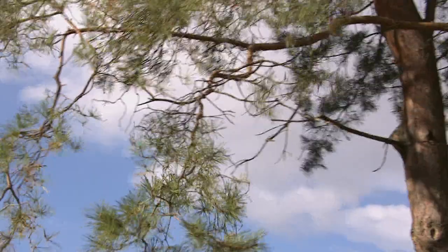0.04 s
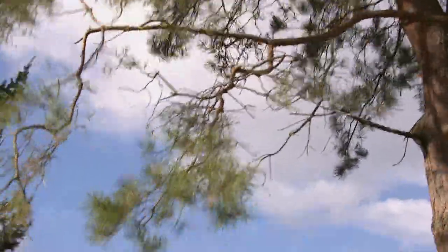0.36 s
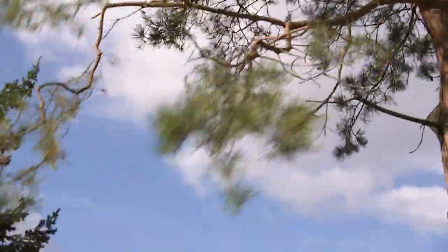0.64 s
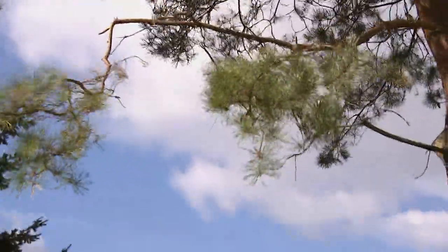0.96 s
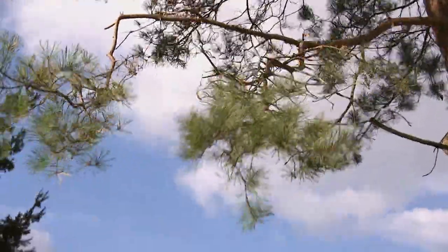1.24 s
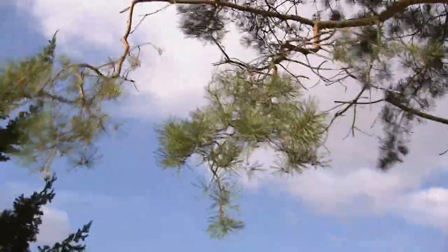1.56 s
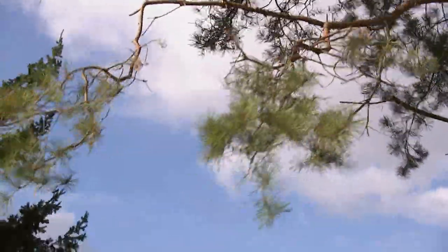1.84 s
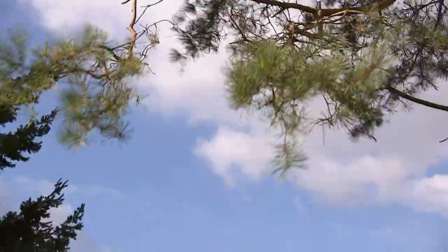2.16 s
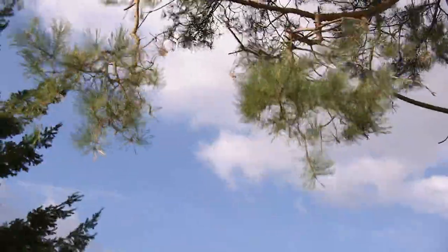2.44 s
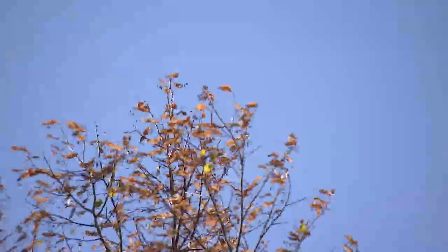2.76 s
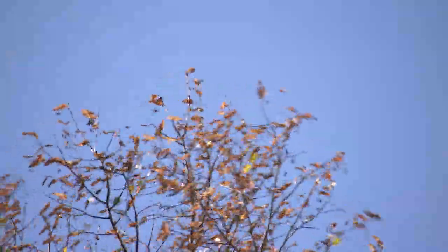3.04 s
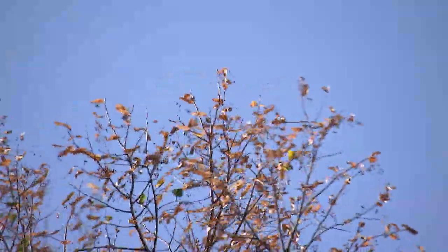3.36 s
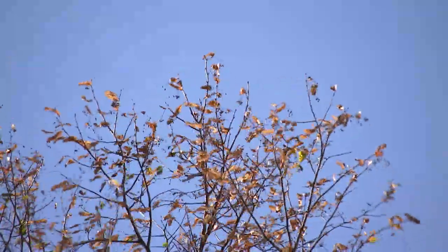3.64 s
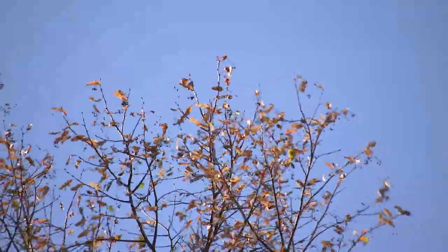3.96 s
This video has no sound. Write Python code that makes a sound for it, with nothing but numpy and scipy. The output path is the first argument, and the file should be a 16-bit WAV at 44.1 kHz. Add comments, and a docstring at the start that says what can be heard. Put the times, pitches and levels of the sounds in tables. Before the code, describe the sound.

Strong wind buffets the microphone, a low uneven rumble over a soft hiss of pine needles. From about 0.5 seconds gusts land as thumps and dull pops, hardest around 2.5 to 2.7. Two barely audible high bird chirps come before 1 second. At 2.7 the left side cuts to a bright rush of dry leaves ticking and slapping until 4 seconds; the buffeting continues on the right, stopping at 3.4.

```python
"""Strong wind buffets a microphone under a pine: gusts rumble and thump over the hiss of the needles
and two faint bird chirps. Hard thumps pop the capsule and trip a limiter, which ducks rumble and hiss.
Then the left channel cuts to a second spot, a bright rush of dry leaves that tick and slap,
while the buffeting goes on in the right channel until that cuts to silence."""
import sys
import numpy as np
from scipy import signal
from scipy.fft import rfft, irfft
from scipy.io import wavfile
from scipy.ndimage import uniform_filter1d

SR = 44100
rng = np.random.default_rng(int(sys.argv[2]) if len(sys.argv) > 2 else 0)


def inscribe(sig):
    """Save sig as 16-bit PCM at rate SR to the path in sys.argv[1].

    A 1-D sig is mono; a 2-D sig holds one channel per row.
    Samples are clipped to [-1, 1] before scaling.
    """
    pcm = np.round(np.clip(np.atleast_2d(sig).T, -1, 1) * 32767)
    wavfile.write(sys.argv[1], SR, pcm.astype(np.int16))


N = 176400

# Single hard eddies hitting the microphone (time [s], thump level [dB], pitch [Hz], pop level [dB])
THUMPS = [(.466, -9, 197, -34), (.542, -7, 121, -40), (.714, -8.5, 190, -29), (.783, -9, 209, -35),
          (0.829, -6, 160, -29), (1.122, -8, 173, -37), (1.181, -5.5, 140, -24.5), (1.3, -7.5, 224, -32.5),
          (1.399, -11, 220, -26.5), (1.529, -8, 200, -29.5), (1.584, -5.5, 118, -32.5),
          (1.919, -5.5, 159, -33), (2.525, -4, 138, -21), (2.622, -6, 220, -25), (2.696, -5, 200, -26.5)]


def amp(db):
    """Decibels to gain."""
    return 10 ** (np.asarray(db) / 20)


def unit(x):
    """Scales to rms 1."""
    return x / np.sqrt(np.mean(x ** 2) + 1e-20)


def clock():
    """Time of every sample."""
    return np.arange(N) / SR


def level(points):
    """Gain envelope through (time [s], level [dB]) points."""
    return amp(np.interp(clock(), *np.transpose(points)))


def colour(x, points):
    """Shapes x with an EQ curve of (frequency [Hz], level [dB]) points, at rms 1."""
    hz, db = np.transpose(points)
    f = np.fft.rfftfreq(N, 1 / SR)
    eq = amp(np.interp(np.log(f + 1), np.log(hz), db))
    return unit(irfft(rfft(x) * eq, N))


def lowpass(x, hz, order=2):
    """The part of x below hz."""
    return signal.sosfiltfilt(signal.butter(order, hz, fs=SR, output="sos"), x)


def wander(hz):
    """Random modulation of rms 1, at rates up to about hz."""
    f = np.fft.rfftfreq(N, 1 / SR)
    return unit(irfft(rfft(rng.standard_normal(N)) * np.exp(-(f / hz) ** 2), N))


def patchy_noise(depth_db):
    """White noise whose level drifts in small patches of time and frequency."""
    spectra = signal.stft(rng.standard_normal(N), nperseg=512)[2]
    patches = uniform_filter1d(rng.standard_normal(spectra.shape), size=7, axis=0)
    patches = uniform_filter1d(patches, size=8, axis=1)
    return signal.istft(spectra * amp(depth_db * unit(patches)))[1][:N]


def burst(s, half_width_s):
    """A bell-shaped envelope centred on time s."""
    return np.exp(-((clock() - s) / half_width_s) ** 2)


def strike(s, decay_s, attack_s=.0001):
    """An envelope that jumps up at time s and dies away."""
    age = np.maximum(clock() - s, 0)
    return np.minimum(age / attack_s, 1) * np.exp(-age / decay_s)


def held(db, release_db_per_s):
    """Holds each peak of db and lets it sink at a steady rate."""
    fall = release_db_per_s * clock()
    return np.maximum.accumulate(db + fall) - fall


def bird():
    """A small bird's faint, thin calls: pure tones that slide down."""
    # Calls (time [s], half-width [s], pitch [Hz], glide [Hz/s], level [dB])
    chirps = [(0.622, .009, 9500, -30000, -66), (.938, .012, 8560, -2000, -69)]
    out = np.zeros(N)
    for s, half_width_s, hz, glide, db in chirps:
        age = clock() - s
        out += amp(db) * burst(s, half_width_s) * np.sin(2 * np.pi * (hz + glide * age / 2) * age)
    return out


def needles():
    """Smooth hiss of air through pine needles."""
    # Colour of the hiss (frequency [Hz], level [dB])
    hiss_eq = [(100, 10), (300, 3), (600, 2), (950, -0.5), (1400, -3), (2100, -6.5), (2900, -8.5),
               (4000, -14), (5500, -18), (6400, -22.5), (7500, -23), (10500, -27), (13000, -33.5),
               (14500, -38)]
    # Envelope of the hiss (time [s], level [dB])
    hiss_envelope = [(.05, -42.5), (.3, -42), (.45, -42.5), (.6, -43.5), (.9, -45), (1.4, -46), (2.0, -46),
                     (2.45, -46.8), (2.75, -45.5), (3.0, -45), (3.44, -50.5)]
    return colour(patchy_noise(depth_db=1.0), hiss_eq) * level(hiss_envelope)


def leaves():
    """A broad, fluttering rush of foliage, with countless dry leaves ticking against each other."""
    # Colour of the rush (frequency [Hz], level [dB])
    rush_eq = [(20, -19), (45, -31), (85, -12), (115, -12.5), (170, 4.5), (250, 0.5), (370, -1.5),
               (480, -5.5), (950, -7.5), (1400, -12.5), (2100, -16), (2900, -14.5), (4000, -17),
               (5600, -19), (6400, -23), (7500, -21), (10500, -26), (12500, -33), (15000, -33)]
    # Envelope of the rush (time [s], level [dB])
    rush_envelope = [(2.72, -29), (2.9, -31), (3.05, -29), (3.3, -28.5), (3.6, -29.5), (4.0, -29.5)]
    # Colour of a tick (frequency [Hz], level [dB])
    tick_eq = [(300, -34), (1800, -22), (2900, 10), (4000, 2), (5400, -5), (6500, -11.5), (10000, -10),
               (12500, -13), (15000, -16)]
    flutter_db, ticks_per_s, tick_spread_db = -0.5, 300, 3
    rush = colour(patchy_noise(depth_db=0.77), rush_eq) * level(rush_envelope)
    rush *= amp(flutter_db * wander(hz=25))
    sizes = amp(tick_spread_db * np.minimum(rng.exponential(1, N), 4)) * rng.choice([-1, 1], N)
    contacts = rng.random(N) < ticks_per_s / SR
    return rush + amp(-48) * colour(sizes * contacts, tick_eq)


def slaps():
    """A dry leaf hits a twig: a thin, bright crack and a brief, unsteady ring of the blade."""
    # Leaf hits (time [s], crack level [dB], ring level [dB], pitch [Hz])
    hits = [(2.7303, -24.5, -38, 4520), (2.823, -40, -27, 2990), (2.826, -18, -34, 3950),
            (2.836, -37, -26, 3700), (2.848, -28, -28, 3510), (2.851, -15, -28, 4600),
            (2.857, -30, -29, 3570), (3.058, -28, -34, 4500), (3.246, -26, -35, 3250),
            (3.317, -33, -22, 2750), (3.563, -38, -33, 2890), (3.634, -35, -24, 3010)]
    # Colour of the crack (frequency [Hz], level [dB])
    crack_eq = [(300, -20), (1500, -9), (3000, 9.5), (5400, 0.5), (7000, -11), (11500, -6), (15000, -15)]
    crack = colour(rng.standard_normal(N), crack_eq)
    waver_hz = 302 * wander(hz=302)
    out = np.zeros(N)
    for s, crack_db, ring_db, hz in hits:
        ring = np.sin(2 * np.pi * np.cumsum(hz + waver_hz) / SR)
        out += amp(crack_db) * strike(s, decay_s=.0009) * crack
        out += amp(ring_db) * strike(s, decay_s=.0035) * ring
    return out


def pops():
    """Each thump bottoms out the capsule: a short, dull pop amid a brief flap of rough air."""
    # Colour of the overdriven capsule (frequency [Hz], level [dB])
    pop_eq = [(200, -3.5), (550, 7.5), (900, -5.5), (1500, -14.5), (3000, -27.5), (6000, -42.5),
              (12000, -62)]
    pop = colour(signal.unit_impulse(N), pop_eq)
    pop /= pop.max()
    flap = amp(-16) * colour(rng.standard_normal(N), pop_eq)
    return sum(amp(db) * (np.roll(pop, round(s * SR)) + flap * burst(s, half_width_s=0.0072))
               for s, _, _, db in THUMPS)


def overload(x):
    """A limiter ducks on strong suction, with a slow and a fast release; what slips past is flattened."""
    threshold_db, ceiling_db, attack_s, knee = -11.5, -12.5, 0.0015, 4.7
    over_db = np.maximum(20 * np.log10(np.maximum(-x, 1e-6)) - threshold_db, 0)
    duck_db = held(over_db, release_db_per_s=11.5) + held(.55 * over_db, release_db_per_s=42)
    pole = np.exp(-1 / (attack_s * SR))
    ducked = x * amp(-signal.lfilter([1 - pole], [1, -pole], duck_db))
    suction = np.maximum(-ducked, 0) / amp(ceiling_db)
    return ducked / (1 + suction ** knee) ** (1 / knee)


def buffeting():
    """Eddies rumble on the microphone, louder and brighter in strong gusts; a few land as thumps."""
    # Force of the wind on the microphone (time [s], level [dB])
    gusts = [(.06, -34.5), (.12, -30), (.16, -38.5), (.31, -32), (.35, -39), (.38, -25.5), (.47, -22.5),
             (.51, -29.5), (.54, -18), (.59, -24), (.68, -22), (.72, -17), (.785, -14.5), (.87, -22),
             (.975, -21.5), (1.01, -28), (1.06, -29.5), (1.11, -17.5), (1.145, -25.5), (1.2, -16.5),
             (1.26, -26), (1.3, -17.5), (1.36, -27.5), (1.41, -15), (1.47, -24), (1.55, -16), (1.62, -19.5),
             (1.75, -18.5), (1.87, -25), (1.915, -17.5), (1.94, -26.5), (2.07, -22), (2.14, -26.5),
             (2.21, -21), (2.26, -26.5), (2.31, -22), (2.44, -32.5), (2.51, -27), (2.56, -13), (2.6, -19.5),
             (2.69, -14), (2.72, -25), (2.8, -28.5), (2.88, -27.5), (2.91, -20.5), (2.97, -24.5),
             (3.02, -17.5), (3.11, -26), (3.145, -19), (3.24, -26.5), (3.37, -24.5), (3.44, -22)]
    # Colour of the eddies (frequency [Hz], level [dB])
    rumble_eq = [(10, -32.5), (22, -14), (45, -1.5), (90, 0), (170, 0), (250, -2), (310, -9.5), (450, -19),
                 (600, -28.5), (950, -39.5), (2000, -63.5), (5000, -98)]
    usual_gust_db, bright_db_per_db, rumble_db, flutter_db = -19.5, 0.076, 1.5, 1.62
    force = level(gusts)
    eddies = colour(rng.standard_normal(N), rumble_eq)
    deep, upper = lowpass(eddies, hz=75), eddies - lowpass(eddies, hz=350)
    deep_gain = level([(.1, 2), (1.2, 0), (2.3, -2), (2.7, -6.5), (3.3, -20)])  # the sub-bass thins out
    upper_gain = (force / amp(usual_gust_db)) ** bright_db_per_db
    eddies = eddies + deep * (deep_gain - 1) + upper * (upper_gain - 1)
    eddies /= np.sqrt(uniform_filter1d(eddies ** 2, size=1800))  # even out, so the gusts set the level
    out = eddies * force * amp(rumble_db + flutter_db * wander(hz=22))
    width_cycles, lead_cycles = 0.43, 0.071
    for s, db, hz, _ in THUMPS:  # a pulse of suction briefly takes the place of the rumble
        cycles = (clock() - s) * hz
        window = np.exp(-((cycles + lead_cycles) / width_cycles) ** 2 / 2)
        out = out * (1 - window) - amp(db) * window * np.cos(2 * np.pi * cycles)
    return out


def scene():
    """Wind under the pine in both channels, cutting to leaves on the left and to silence on the right."""
    pine_on_s, leaves_on_s, pine_off_s = 0.05, 2.725, 3.446
    t = clock()
    pine = overload(buffeting() + needles()) + pops() + bird()
    pine = lowpass(pine, hz=13600, order=8) * (t > pine_on_s)
    left = np.where(t < leaves_on_s, pine, leaves() + slaps())
    right = amp(-6) * pine * (t < pine_off_s)
    return np.array([left, right])


def record(dry):
    """A steep high cut takes off the top of the treble."""
    high_cut = signal.firwin(511, cutoff=15500, window=("kaiser", 9), fs=SR)
    return signal.oaconvolve(dry, high_cut[None], "same")


dry = scene()
out = record(dry)
inscribe(out)
```